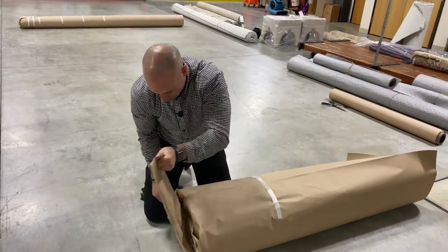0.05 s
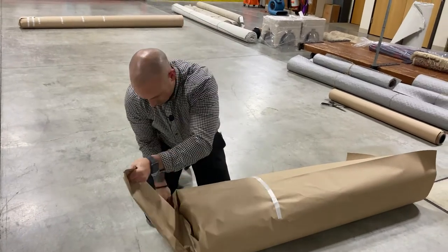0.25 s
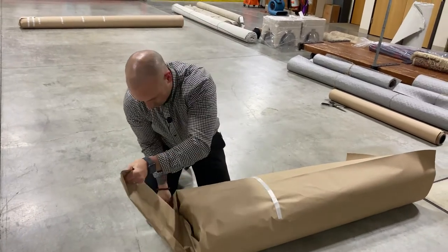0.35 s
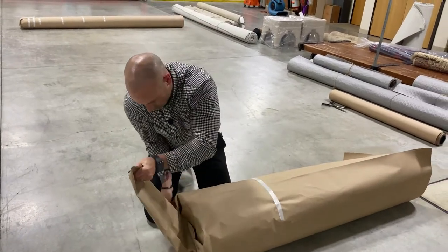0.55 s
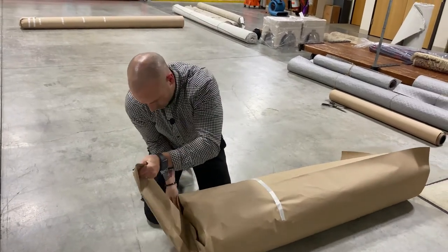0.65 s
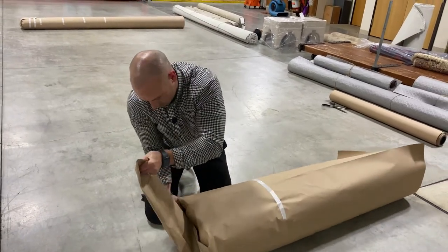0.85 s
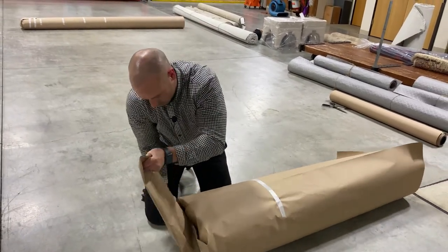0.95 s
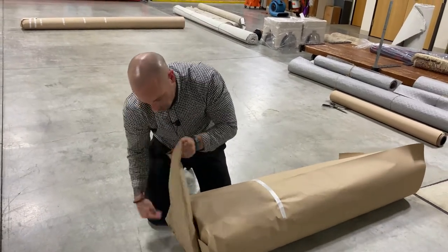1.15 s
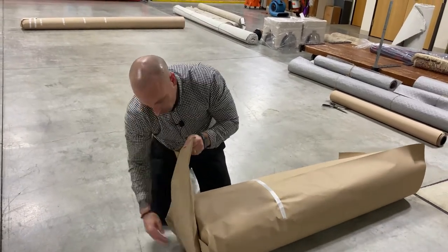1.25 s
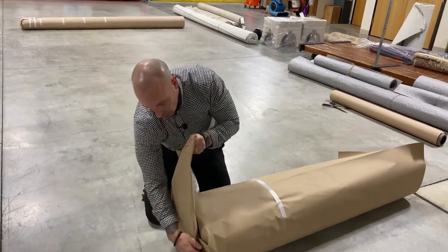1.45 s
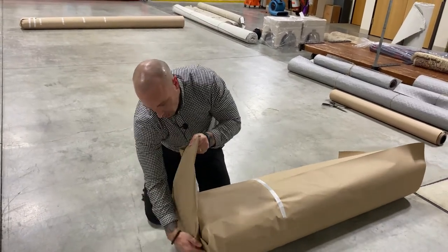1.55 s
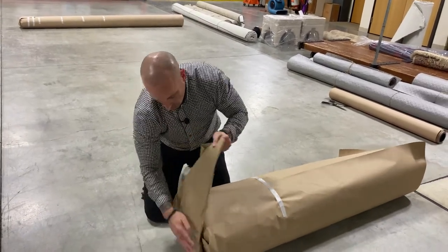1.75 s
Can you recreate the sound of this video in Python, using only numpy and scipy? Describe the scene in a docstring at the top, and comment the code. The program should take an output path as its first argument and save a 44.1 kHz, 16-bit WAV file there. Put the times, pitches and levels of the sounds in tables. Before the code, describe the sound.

Heavy wrapping paper is folded close by, starting with a faint tick. From 0.2 to 1 second it slides with a grainy rustle, low flapping thumps and crease snaps, with a dull hollow pop at 0.8. After a brief lull, sharp crackles and a thump come near 1.15 seconds. A soft brushing hiss follows until 1.5, and light crackles continue to 1.8, over low, faintly echoing warehouse room tone.

```python
"""Heavy wrapping paper, folded close by around the end of a large roll on a warehouse floor.
Creases snap in bursts of fibre clicks; stiff facets flip and ring. The sheet flaps with low thumps,
gives one dull hollow pop and slides with a grainy rustle; hand and loose flap brush it with a soft hiss.
The hollow roll and the hall answer faintly over a low room tone."""
import sys
import numpy as np
from scipy import signal
from scipy.fft import rfft, irfft
from scipy.io import wavfile
from scipy.ndimage import uniform_filter1d

SR = 44100
rng = np.random.default_rng(int(sys.argv[2]) if len(sys.argv) > 2 else 0)


def log_audio(samples):
    """Write samples as a 16-bit WAV file to the path given in sys.argv[1]."""
    # one column per channel
    frames = np.atleast_2d(samples).T
    # limit to full scale, then quantise
    limited = np.clip(frames, -1, 1)
    pcm = np.round(limited * 32767).astype(np.int16)
    wavfile.write(sys.argv[1], SR, pcm)


N = 79380

# room tone spectrum (frequency [Hz], relative density [dB])
ROOM_SPECTRUM = [(20, 8.5), (70, 4), (200, -12.5), (600, -11.5), (1500, -25.5), (4000, -36), (8000, -37.5),
                 (16000, -40.5)]
# hall decay (frequency [Hz], T60 [s])
HALL_T60 = [(600, 0.67), (3000, 0.57), (12000, 1)]
# hollow roll modes (frequency [Hz], gain [dB])
ROLL_MODES = [(473, -24), (566, -10), (626, -14), (822, -0.5)]
# hand and flap strokes (start [s], end [s], level [dB], centre [Hz], half-width [Hz])
BRUSHES = [(0.982, 1.124, -68.5, 10400, 1730), (1.167, 1.498, -62, 3900, 790)]
# sliding envelope (time [s], body level [dB], treble level [dB])
SLIDE_LEVELS = [(.07, -80, -69.5), (.11, -58.5, -57), (.18, -78, -77), (.225, -53, -53.5),
                (.265, -51, -55.5), (.30, -45, -50), (.39, -41.5, -48.5), (.52, -44, -48), (.6, -54, -51),
                (.64, -44.5, -44.5), (.67, -41.5, -48), (.70, -39, -45.5), (.8, -40, -47.5),
                (.88, -46.5, -50.5), (.93, -55, -59.5), (1.0, -54.5, -57.5), (1.10, -49.5, -51),
                (1.145, -43, -49.5), (1.19, -43.5, -48), (1.24, -50.5, -53.5), (1.3, -62.5, -63.5),
                (1.37, -66.5, -61), (1.4, -52.5, -56), (1.45, -77, -62.5), (1.55, -75, -77),
                (1.61, -54.5, -55), (1.65, -72, -64), (1.72, -56.5, -66), (1.78, -50, -57.5)]
# sliding spectra (frequency [Hz], relative density [dB])
SLIDE_BODY_SPECTRUM = [(100, 1.5), (250, 1), (470, 1.5), (700, -1), (1000, -19), (1500, -24.5), (2800, -46)]
SLIDE_TREBLE_SPECTRUM = [(500, -29.5), (1000, 4.5), (1550, 3.5), (2100, 0), (3200, 0.5), (4000, -6.5),
                         (5000, -4), (5900, -13.5), (6900, -9), (8200, -18), (11000, -23), (14000, -24),
                         (16000, -42)]
# buffeting envelope (time [s], level [dB])
BUFFET_LEVELS = [(0, -74), (.2, -64), (.23, -34.5), (.3, -23.5), (.46, -16.5), (.65, -19.5), (.8, -22),
                 (.97, -27), (.99, -46), (1.14, -47.5), (1.18, -20.5), (1.29, -84), (1.47, -47),
                 (1.54, -74), (1.8, -45.5)]
# buffeting spectrum (frequency [Hz], relative density [dB])
BUFFET_SPECTRUM = [(12, -5.5), (25, 10.5), (70, -4), (150, -5), (210, -19.5), (300, -25.5), (500, -53.5),
                   (1200, -77)]
# sheet flaps (time [s], level [dB], pitch at peak [Hz])
THUMPS = [(0.218, -12, 50.3), (0.281, -6.5, 50.7), (0.349, -18, 86.4), (0.395, -12.5, 62.5),
          (0.448, -1, 64.8), (0.498, -11.5, 56.5), (.536, -8.5, 68.7), (0.568, -6.5, 33.8),
          (.607, -8, 75.3), (0.642, -12.5, 103.8), (0.703, -12.5, 101.4), (0.726, -5.5, 57.3),
          (0.792, -15, 54), (.841, -14.5, 63.7), (0.882, -9.5, 75.7), (0.951, -11.5, 56), (.967, -26, 122),
          (1.01, -26.5, 43.4), (1.149, -16, 69), (1.207, -21.5, 44), (1.38, -34.5, 56.4)]
# short low knocks: thump attack, hollow pop, thump attack (time [s], level [dB], pitch at peak [Hz])
KNOCKS = [(.608, -17.5, 148), (.8005, -19.5, 505), (1.151, -18.5, 171)]
# flipping facets (time [s], level [dB], pitch [Hz])
FACETS = [(.08, -44, 605), (.648, -31, 3120), (0.648, -30.5, 1350), (1.0515, -43, 3020), (1.053, -38, 1500),
          (1.1503, -27, 1357), (1.156, -31.5, 2780), (1.1663, -25, 3250), (1.1678, -27.5, 1650),
          (1.4533, -33.5, 2520), (1.474, -43, 2260), (1.667, -40.5, 1550)]
# crease snaps, relative band energies (time [s], body [dB], mid [dB], treble [dB], decay [s], top [Hz])
SNAPS = [(.106, -49.5, -47.5, -44, 0.0027, 10900), (0.249, -59, -43.5, -47, 0.0031, 6000),
         (0.3232, -69, -39, -40, 0.00096, 8060), (.542, -32.5, -34.5, -45, 0.0021, 5960),
         (.557, -44, -38.5, -47, 0.0037, 4000), (0.643, -63, -56, -37.5, 0.0062, 13000),
         (0.6479, -30.5, -34, -35.5, 0.0022, 15100), (0.7551, -55, -68, -25, 0.001, 6800),
         (.770, -72, -32.5, -47, 0.0022, 7000), (1.052, -39, -35.5, -43, 0.0042, 5900),
         (1.133, -69, -37.5, -57, 0.0017, 6040), (1.1507, -33, -32.5, -38.5, 0.0054, 8500),
         (1.1667, -57, -32, -36, 0.0022, 5030), (1.2668, -51, -44, -62, 0.0019, 4930),
         (1.4537, -51, -38.5, -50, 0.0014, 7440), (1.463, -44, -40.5, -49.5, 0.0054, 7540),
         (1.571, -45.5, -52, -70, 0.012, 6000), (1.584, -63, -49.5, -52.5, 0.0011, 7400),
         (1.667, -42, -42.5, -52.5, 0.016, 2920), (1.732, -44, -43, -45.5, 0.0033, 10900),
         (1.742, -43, -44.5, -60, 0.002, 6200), (1.758, -83, -40, -45, 0.0041, 7600)]
# stiff sheet response (frequency [Hz], relative gain [dB])
SNAP_SPECTRUM = [(100, -4.5), (250, -2.5), (520, 2), (900, -0.5), (1480, 4), (2050, -2.5), (3300, 0.5),
                 (5300, -6), (5900, -7.5), (6800, -9), (8200, -15.5), (11000, -16.5), (16000, -29.5)]


def amp(db):
    """Decibels to gain."""
    return 10 ** (np.asarray(db) / 20)


def unit(x):
    """Scale to unit rms."""
    return x / np.sqrt(np.mean(x ** 2) + 1e-20)


def read(points, hz):
    """Table lookup on a log-frequency axis."""
    table_hz, value = np.transpose(points)
    return np.interp(np.log(hz + 1), np.log(table_hz), value)


def level(curve, column=1):
    """Gain over time from one dB column."""
    rows = np.array(curve)
    return amp(np.interp(np.arange(N) / SR, rows[:, 0], rows[:, column]))


def add(mix, start_s, sound):
    """Mix a sound in at a start time."""
    part = mix[max(0, round(start_s * SR)):][:len(sound)]
    part += sound[:len(part)]


def colour(x, spectrum, size=8192):
    """Minimum-phase filter with the given spectrum."""
    gain = amp(read(spectrum, abs(np.fft.fftfreq(size, 1 / SR))))
    response = np.exp(np.conj(signal.hilbert(np.log(gain))))
    taps = np.fft.ifft(response).real[:size // 2]
    return signal.fftconvolve(x, taps)[:len(x)]


def whiten(burst, smooth_bins=160):
    """Flatten the broad spectrum, keep the fine ripple."""
    spectrum = np.fft.fft(burst, 2 * len(burst))
    power = uniform_filter1d(abs(spectrum) ** 2, smooth_bins, mode="wrap")
    return np.fft.ifft(spectrum / np.sqrt(power + 1e-12)).real[:len(burst)]


def wander(top_hz):
    """Slow random motion, unit rms."""
    lowpass = 1 / (1 + (np.fft.rfftfreq(N, 1 / SR) / top_hz) ** 4)
    return unit(irfft(rfft(rng.standard_normal(N)) * lowpass, N))


def room_tone(level_db=-56):
    """Steady low warehouse noise."""
    return amp(level_db) * unit(colour(rng.standard_normal(N), ROOM_SPECTRUM))


def hall(x, tail_db=-10, echo_db=-18, echoes=8):
    """Early echoes from floor and body, then a faint tail."""
    hz, t, noise = signal.stft(rng.standard_normal(SR), SR, nperseg=256)
    decay = amp(-60 * t / read(HALL_T60, hz)[:, None])
    response = signal.istft(noise * decay, SR, nperseg=256)[1]
    response *= amp(tail_db) / np.linalg.norm(response)
    delays_s = rng.uniform(.003, .025, echoes)
    response[(delays_s * SR).astype(int)] += amp(echo_db) * rng.choice([-1, 1], echoes) / np.sqrt(echoes)
    return signal.fftconvolve(x, response)[:N]


def roll(x, t60_s=.07):
    """The hollow roll rings with the paper."""
    t = np.arange(SR // 2) / SR
    ring = sum(amp(db - 60 * t / t60_s) * np.cos(2 * np.pi * hz * t) for hz, db in ROLL_MODES)
    resonance_gain = t60_s * SR / (2 * np.log(1000))
    return signal.fftconvolve(x, ring / resonance_gain)[:N]


def brushes(fade_s=.026):
    """Light strokes on the smooth paper face: soft, narrow hiss."""
    out, t, hz = np.zeros(N), np.arange(N) / SR, np.fft.rfftfreq(N, 1 / SR)
    for start_s, end_s, db, centre_hz, half_width_hz in BRUSHES:
        band = 1 / (1 + ((hz - centre_hz) / half_width_hz / 2) ** 2) ** 2
        hiss = unit(irfft(rfft(rng.standard_normal(N)) * band, N))
        gate = np.clip(np.minimum(t - start_s, end_s - t) / fade_s, 0, 1)
        out += amp(db) * hiss * gate
    return out


def slide(catches_per_s=1300, spread_db=2.5, catch_share=.7, flicker_db=2.06, flicker_hz=58):
    """Paper on paper: tiny uneven catches in a fine hiss."""
    catches = (rng.random(N) < catches_per_s / SR) * rng.choice([-1, 1], N)
    catches = catches * amp(spread_db * np.minimum(rng.exponential(1, N), 4))
    rub = np.sqrt(catch_share) * unit(catches) + np.sqrt(1 - catch_share) * rng.standard_normal(N)
    rub *= amp(flicker_db * wander(flicker_hz))
    body = level(SLIDE_LEVELS, column=1) * unit(colour(rub, SLIDE_BODY_SPECTRUM))
    treble = level(SLIDE_LEVELS, column=2) * unit(colour(rub, SLIDE_TREBLE_SPECTRUM))
    return body + treble


def flex(x, depth_db=1.5, patch_hz=920, patch_s=.02):
    """Spectral patches swell and fade as the sheet changes shape."""
    frames = signal.stft(x, SR, nperseg=512, noverlap=384)[2]
    patches = rng.standard_normal(frames.shape)
    for axis, span in enumerate((patch_hz * 512 / SR, patch_s * SR / 128)):
        kernel = np.exp(-(2 * np.arange(-40, 41) / span) ** 2)
        patches = signal.fftconvolve(patches, np.expand_dims(kernel, 1 - axis), "same")
    return signal.istft(frames * amp(depth_db * unit(patches)), SR, nperseg=512, noverlap=384)[1][:N]


def crinkles(flips_per_s=73, relative_db=-8.5, decay_s=.0013, range_hz=(1110, 6480), pitches=12):
    """Small facets flip at random as the sheet slides; each rings briefly."""
    out, t = np.zeros(N), np.arange(512) / SR
    for hz in np.geomspace(*range_hz, pitches):
        flips = (rng.random(N) < flips_per_s / pitches / SR) * (2 * rng.random(N) - 1)
        ring = (np.sin(2 * np.pi * hz * t) + .5 * rng.standard_normal(len(t))) * np.exp(-t / decay_s)
        out += signal.fftconvolve(flips, ring)[:N]
    return amp(relative_db) * level(SLIDE_LEVELS, column=2) * unit(colour(out, SLIDE_TREBLE_SPECTRUM))


def facets(swell_cycles=2.07):
    """A stiff facet flips and rings a few cycles; its size sets the pitch."""
    out, t = np.zeros(N), np.arange(2048) / SR
    for start_s, db, hz in FACETS:
        age = hz * t / swell_cycles
        add(out, start_s, amp(db) * np.sin(2 * np.pi * hz * t) * age * np.exp(1 - age))
    return out


def swing(hz, peak_s, sag=.87, sag_s=.0069, sharpness=1.51):
    """Heavily damped swing of the sheet; pitch sags as the paper slackens."""
    t = np.arange(8192) / SR
    pitch_hz = hz * (1 + sag * (np.exp(-t / sag_s) - np.exp(-peak_s / sag_s)))
    envelope = (t / peak_s * np.exp(1 - t / peak_s)) ** sharpness
    return -np.sin(2 * np.pi * np.cumsum(pitch_hz) / SR) * envelope


def knocks():
    """Short low knocks: the sharp attack of two sheet thumps, and one dull hollow pop."""
    out = np.zeros(N)
    for start_s, db, hz in KNOCKS:
        add(out, start_s, amp(db) * swing(hz, peak_s=.0019))
    return out


def buffet():
    """Low, irregular buffeting of the moving sheet."""
    return level(BUFFET_LEVELS) * unit(colour(rng.standard_normal(N), BUFFET_SPECTRUM))


def thumps(tautness=.23):
    """Low flaps; the sheet pulls taut at each swing."""
    out = np.zeros(N)
    for start_s, db, hz in THUMPS:
        flap = swing(hz, peak_s=.012)
        add(out, start_s, amp(db) * flap * (1 - tautness + tautness * flap ** 2))
    return out


def snaps(gain_db=-26, rise_s=.00018, spread_db=6, split_hz=(790, 3510)):
    """A crease gives way: a burst of fibre clicks, coloured by the stiff sheet."""
    out, t = np.zeros(N), np.arange(4096) / SR
    edges = ((split_hz[0], "low"), (split_hz, "band"), (split_hz[1], "high"))
    bands = [signal.butter(5, hz, kind, fs=SR, output="sos") for hz, kind in edges]
    for start_s, *band_db, decay_s, top_hz in SNAPS:
        clicks, sizes = rng.standard_normal((2, len(t)))
        clicks *= amp(spread_db * np.tanh(sizes))
        envelope = (1 - np.exp(-t / rise_s)) * np.exp(-t / decay_s)
        burst = colour(whiten(clicks * envelope), SNAP_SPECTRUM)
        burst = signal.sosfilt(signal.butter(2, top_hz, fs=SR, output="sos"), burst)
        for band, db in zip(bands, band_db):
            part = signal.sosfilt(band, burst)
            energy = np.sum(part ** 2) / SR
            add(out, start_s, amp(db + gain_db) * part / np.sqrt(energy))
    return out


def scene():
    """Paper, roll and hall over room tone; thumps and buffeting stay dry. Mono."""
    paper = snaps() + facets() + knocks() + flex(slide() + brushes()) + crinkles()
    return (room_tone() + paper + roll(paper) + hall(paper) + buffet() + thumps())[None]


def record(dry, highpass_hz=8, ceiling=.72, lowpass_hz=15800):
    """Recorder: band limits, and a soft clip that rounds the strongest thump."""
    x = signal.sosfilt(signal.butter(1, highpass_hz, "high", fs=SR, output="sos"), dry)
    clipped = x / (1 + (x / ceiling) ** 10) ** (1 / 10)
    lowpass = signal.firwin(511, lowpass_hz, window=("kaiser", 9), fs=SR)
    return signal.oaconvolve(clipped, lowpass[None], "same")


dry = scene()
out = record(dry)
log_audio(out)
```